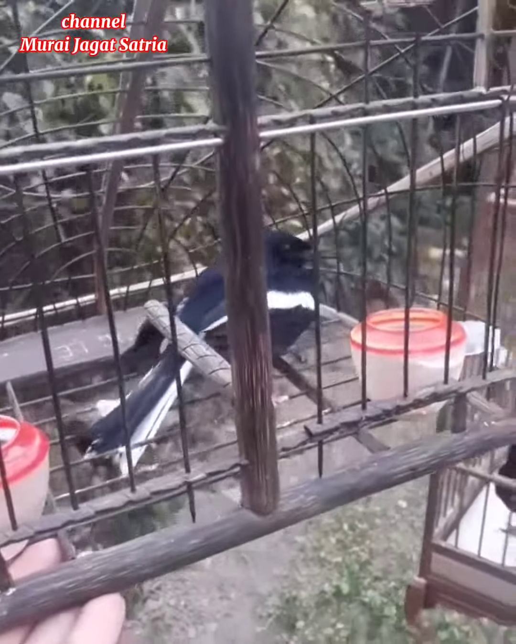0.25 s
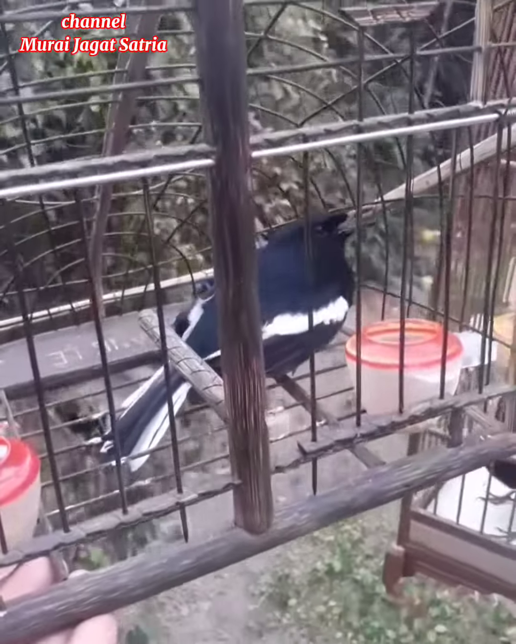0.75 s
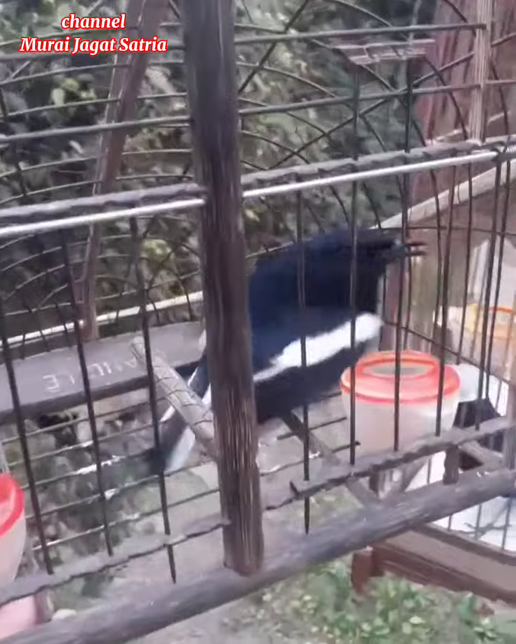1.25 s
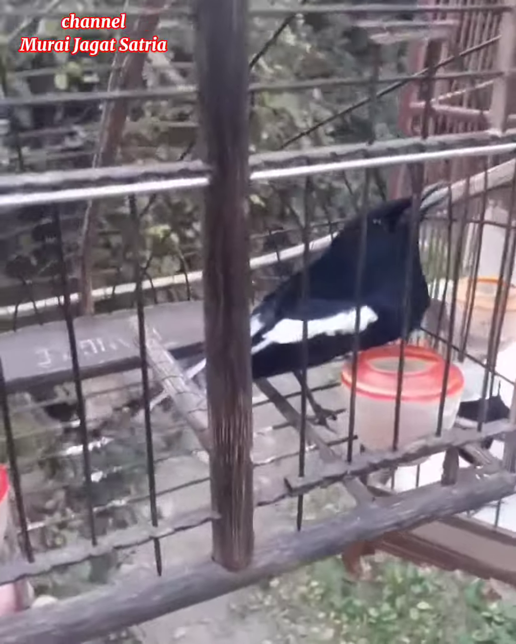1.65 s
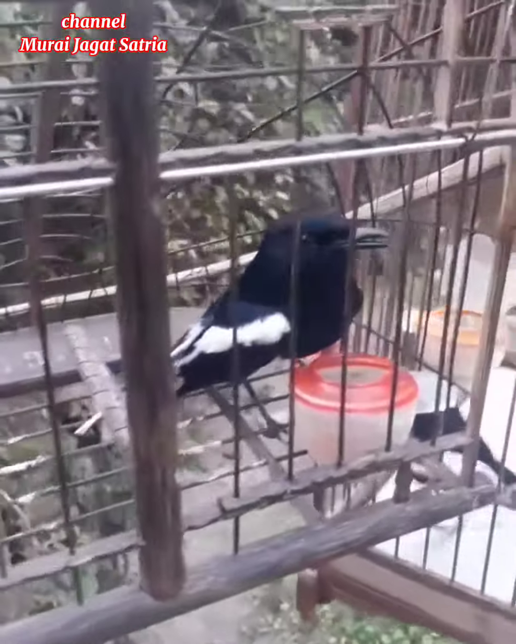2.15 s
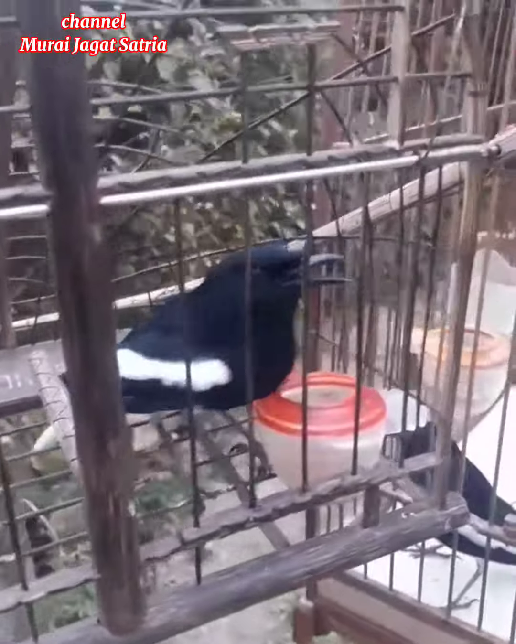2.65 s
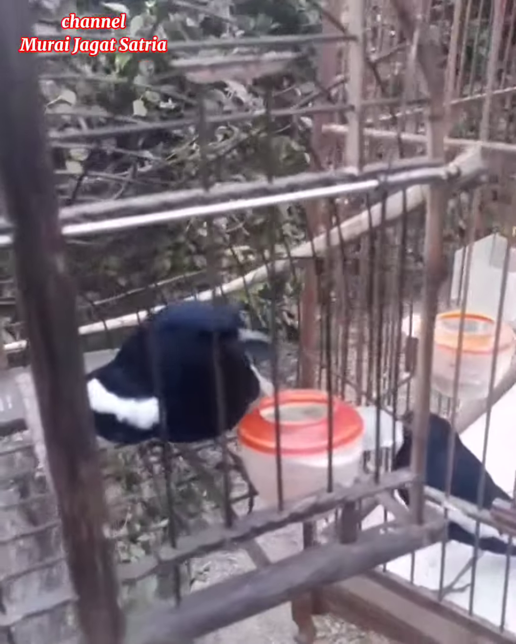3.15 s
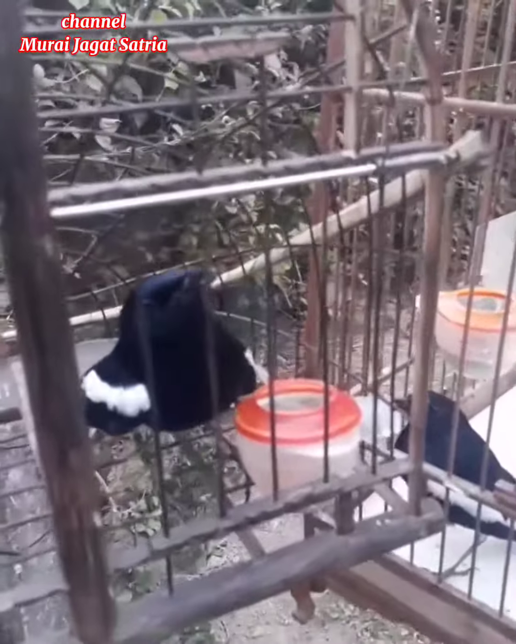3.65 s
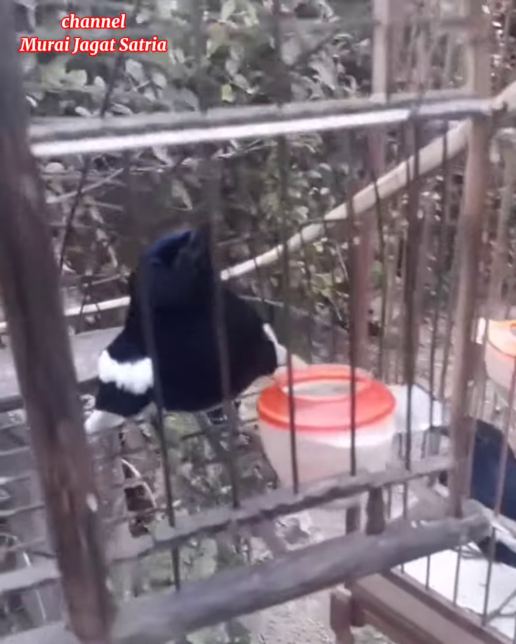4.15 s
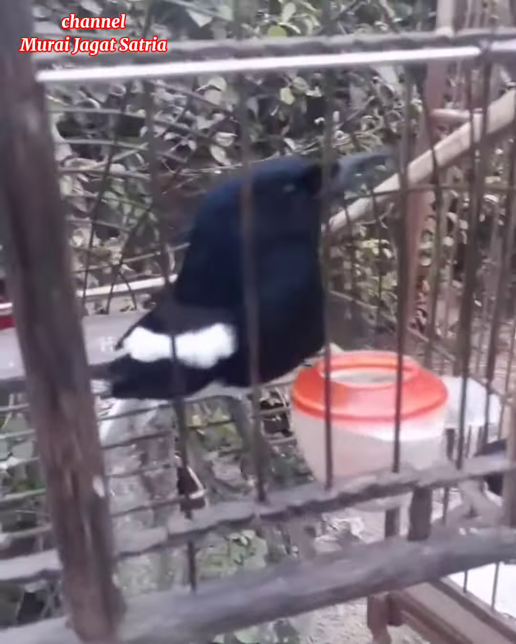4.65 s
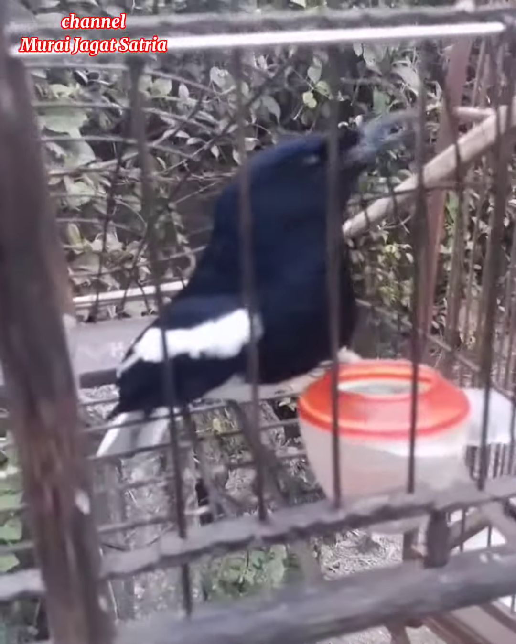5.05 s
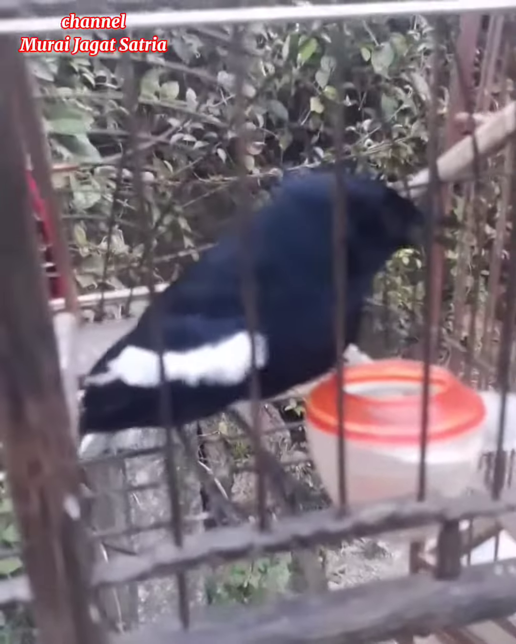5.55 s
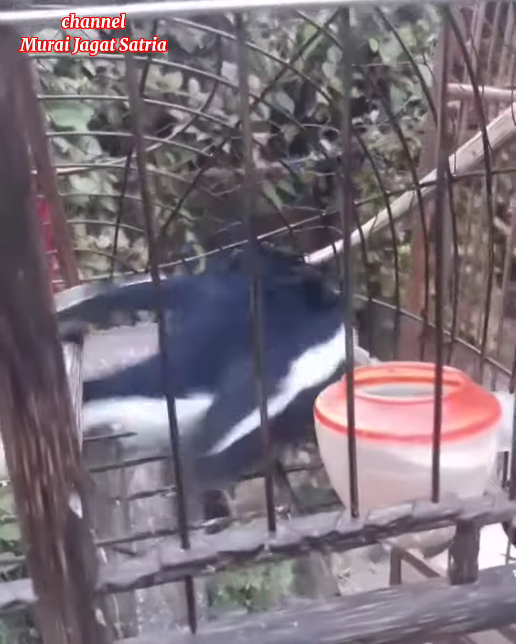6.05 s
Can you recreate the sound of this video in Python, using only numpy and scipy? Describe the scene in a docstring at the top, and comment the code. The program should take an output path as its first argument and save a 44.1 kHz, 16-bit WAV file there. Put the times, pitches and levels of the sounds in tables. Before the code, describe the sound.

A close, loud caged songbird sings in a quiet garden with a short diffuse echo. At 0 s a harsh note dies away; a thin whistle dips and rises sharply by 0.35 s. From 0.5 to 1.45 s come rapid high chirps, including a strong clear note near 1.1 and a steep downward sweep at 1.3. Short lower notes and snaps follow from 1.6, a buzzy note near 2.2, a rough rattle at 2.4 and a rising whistle to 2.75. After a pause, another rattle at 3.1 leads into mellow, buzzing notes until 4. Descending whistles run 4.03-4.43, with cage ticks near 4.33; bright upward chirps at 4.6, long piercing whistles 4.95-5.6, then quick falling and rising chirps 5.8-6.2. Low engine drone fades after 2 s; distant motor throb and faint far birds remain.

```python
"""A harsh note dies away, then a caged magpie-robin sings close by in a garden: whistles, buzzes and rattles.
The syrinx is two tone sources with overtones, flutter and hiss; sounding together, they modulate each other
into sum and difference tones. Decaying noise makes the ticks of feet and beak on the cage; sparse and diffuse
echoes answer from cage and yard. Narrow noise makes birds far off, a row of engine orders makes a distant
motor over a noise wash, and low wavering lines make a second engine that passes and fades."""
import sys
import numpy as np
from scipy import signal
from scipy.fft import rfft, irfft, next_fast_len
from scipy.io import wavfile
from scipy.ndimage import uniform_filter1d, minimum_filter1d

SR = 44100
rng = np.random.default_rng(int(sys.argv[2]) if len(sys.argv) > 2 else 0)


def transcribe(signal):
    """Save signal, clipped to [-1, 1], as a 16-bit WAV file at the path in sys.argv[1]."""
    frames = np.atleast_2d(signal).T
    limited = np.clip(frames, -1, 1)
    pcm = np.round(limited * 32767).astype(np.int16)
    wavfile.write(sys.argv[1], SR, pcm)


N = 277389
TIME = np.arange(N) / SR  # seconds


def amp(db):
    """Decibels to amplitude ratio: 20 dB is a factor of ten."""
    return 10 ** (np.asarray(db) / 20)


def unit(x):
    """Normalises the mean power, so that the rms is 1."""
    return x / np.sqrt(np.mean(x ** 2) + 1e-20)


def along(points, hz):
    """Interpolates (Hz, value) points on a logarithmic frequency axis."""
    f, v = np.transpose(points)
    return np.interp(np.log(hz + 1), np.log(f + 1), v)


def curves(rows):
    """Interpolates linearly in time: one value per sample for each column after the time."""
    s, *cols = np.transpose(rows)
    return [np.interp(TIME, s, c) for c in cols]


def filtered(x, response):
    """Linear filtering: the spectrum of x times a response of frequency."""
    m = next_fast_len(N + SR // 2)
    return irfft(rfft(x, m) * response(np.fft.rfftfreq(m, 1 / SR)), m)[:N]


def coloured(x, points):
    """Spectral shaping: x through a (Hz, dB) response."""
    return filtered(x, lambda hz: amp(along(points, hz)))


def band(centre_hz, width_hz):
    """Band-limited noise of rms 1 under a Gaussian response."""
    return unit(filtered(rng.standard_normal(N), lambda hz: np.exp(-((hz - centre_hz) / width_hz) ** 2)))


def flutter(width_hz):
    """Low-frequency random modulation of rms 1, mostly slower than width_hz."""
    knots = rng.standard_normal(int(3 * width_hz * N / SR) + 2)
    return unit(np.interp(TIME * 3 * width_hz, np.arange(len(knots)), knots))


def gate(t, start, end, edge):
    """Amplitude window: 1 between start and end, with sine-squared edges."""
    return np.sin(np.pi / 2 * np.clip(np.minimum(t - start, end - t) / edge + .5, 0, 1)) ** 2


def around(start, end):
    """The samples of a time interval, with a small margin."""
    return slice(max(int(start * SR) - SR // 200, 0), int(end * SR) + SR // 200)


def stretches(rows, edge):
    """Gated gain: holds each row's dB from its start to its end."""
    out = np.zeros(N)
    for start, end, db in rows:
        span = around(start, end)
        out[span] += amp(db) * gate(TIME[span], start, end, edge)
    return out


def dying(start, t60):
    """Free decay: a sudden start, then an exponential fall of 60 dB in t60 seconds."""
    out, span = np.zeros(N), around(start, start + 2 * t60)
    out[span] = (TIME[span] >= start) * amp(-60 * np.abs(TIME[span] - start) / t60)
    return out


def traffic():
    """Periodic excitation: a motor's thuds filtered by its exhaust, over the wash of road and leaves."""
    # Each row: time in seconds, level of the motor's throb in dB, level of the wash in dB, both before a trim.
    traffic_levels = [(0.0, -55.5, -61.5), (0.46, -47, -59.5), (0.93, -59.5, -53), (1.3, -52.5, -61.5),
                      (1.54, -54.5, -60.5), (3.41, -51.5, -62.5), (4.2, -55.5, -62.5), (4.55, -60, -62.5),
                      (4.87, -57, -64.5), (5.5, -59, -61.5), (5.66, -58, -57.5), (6.29, -59, -64)]
    # Speed of the distant motor. Each row: time in seconds, firings per second.
    motor_speed = [(0, 17.6), (.6, 18.1), (1.5, 18.4), (2.7, 18.7), (4, 18.6), (6.29, 18.5)]
    # Response of its exhaust. Each row: frequency in Hz, gain in dB.
    exhaust = [(15, -40), (25, -16.5), (45, -22.5), (70, -6.5), (100, -2), (130, 4), (150, 4), (175, -0.5),
               (215, -10), (270, -9), (410, -11.5), (520, -21), (1100, -120)]
    # Spectrum of the wash. Each row: frequency in Hz, gain in dB.
    garden = [(120, -20), (200, 1), (579, -5), (1500, -11), (2050, -12.5), (2650, -10.5), (3370, -13),
              (7680, -18.5), (8580, -26.5), (9750, -23.5), (12800, -25), (14900, -34), (16000, -54.5)]
    motor_db, road_db = curves(traffic_levels)
    turns = np.cumsum(curves(motor_speed)[0]) / SR
    # every firing is one soft thud: a row of engine orders, the higher arriving later
    cycle = np.arange(1024) / 1024
    thud = sum(np.cos(2 * np.pi * k * cycle - .25 * k * k) for k in range(3, 26))
    thuds = np.interp(turns % 1, cycle, thud)
    throb = unit(coloured(thuds, exhaust))
    rumble = amp(2) * unit(coloured(rng.standard_normal(N), exhaust))
    wash = unit(coloured(rng.standard_normal(N), garden)) * amp(flutter(width_hz=4))
    return amp(motor_db - 2.4) * (throb + rumble) + amp(road_db + 7.5) * wash


def passing_engine():
    """Common frequency modulation: low lines waver together as the engine's speed wanders."""
    # Each row: time in seconds, gain of all lines in dB.
    passing = [(0, -0.5), (.5, -1.5), (1.4, 0), (2, -2.5), (2.7, -16.5), (4, -18.5), (6.29, -21.5)]
    # The lines. Each row: mean frequency in Hz, rms level in dB before that gain.
    drone = [(75.4, -55), (165, -53.5), (183, -65), (273, -59.5), (414.5, -60.5), (600, -70.5), (680, -67)]
    clock = np.cumsum(1 + 0.0073 * flutter(width_hz=2.2)) / SR
    lines = sum(amp(db) * np.sin(2 * np.pi * (hz * clock + rng.random())) for hz, db in drone)
    return np.sqrt(2) * amp(curves(passing)[0]) * lines


def far_birds():
    """Temporal smearing: distant calls, blurred by echo, arrive as soft swells of narrow noise."""
    # Each row: start in seconds, end in seconds, centre in Hz, half-width in Hz, level in dB.
    far_calls = [(4.266, 4.421, 1343, 249.6, -53.5), (4.359, 4.801, 1037, 179.9, -59),
                 (4.869, 5.037, 2873, 649.4, -57), (5.519, 5.873, 1001, 297, -53),
                 (5.68, 5.86, 2400, 1100, -48)]
    return sum(amp(db) * gate(TIME, start, end, edge=0.088) * band(centre_hz, width_hz)
               for start, end, centre_hz, width_hz, db in far_calls)


def yard(x, near_db, tail_db):
    """Reverberation: sparse weak copies from cage and ground, and a diffuse tail from walls and hedge."""
    # Decay of the tail. Each row: frequency in Hz, 60 dB decay time in seconds.
    yard_decay = [(500, 0.22), (3000, 0.28), (5000, 0.31), (8000, 0.1), (15000, 0.031)]
    hz, t, z = signal.stft(rng.standard_normal(SR), SR, nperseg=256)
    tail = signal.istft(z * amp(-60 * t / along(yard_decay, hz)[:, None]), SR, nperseg=256)[1]
    age = np.arange(len(tail)) / SR
    sparse = (rng.random(len(tail)) < .02) * (age > .001)
    near = rng.standard_normal(len(tail)) * sparse * amp(-60 * age / 0.051)
    # each part is scaled to unit energy before its level
    answer = amp(near_db) * near / np.linalg.norm(near) + amp(tail_db) * tail / np.linalg.norm(tail)
    return signal.fftconvolve(x, answer)[:N]


def cage(ring_at=4.793):
    """Impact and resonance: beak and feet make small dry ticks; one sets a wire ringing."""
    # Each row: time in seconds, level in dB of the two decays whose difference shapes the tick.
    ticks = [(0.101, -15.5), (0.4216, -21), (1.265, -30.5), (1.276, -24), (1.5617, -28.5), (2.031, -23.5),
             (3.185, -22.5), (3.457, -16.5), (4.211, -29), (4.3245, -9), (4.341, -11), (4.793, -32),
             (5.247, -23.5)]
    # Spectrum of the ticks. Each row: frequency in Hz, gain in dB.
    tick_colour = [(1000, -23.5), (3000, 0), (7500, 0.5), (10000, -3.5), (15000, -10.5)]
    # Modes of the cage wire. Each row: frequency in Hz, level in dB, 60 dB decay time in seconds.
    wire = [(1700, -42, 0.091), (5700, -44.5, .07), (8000, -48.5, .07)]
    blows = sum(amp(db) * (dying(s, t60=0.018) - dying(s, t60=0.013)) for s, db in ticks)
    ring = sum(amp(db) * dying(ring_at, t60) * np.sin(2 * np.pi * hz * TIME) for hz, db, t60 in wire)
    return blows * unit(coloured(rng.standard_normal(N), tick_colour)) + ring


def spits():
    """Transient turbulence: bright noise bursts as the syrinx snaps open, and one duller harsh note."""
    # Sharp starts of notes. Each row: start in seconds, end in seconds, level in dB.
    spit_times = [(2.3035, 2.308, -22.5), (2.308, 2.319, -30.5), (2.42, 2.427, -14.5), (2.427, 2.435, -23),
                  (5.941, 5.947, -29), (5.947, 5.957, -32.5)]
    # Spectrum of the bursts. Each row: frequency in Hz, gain in dB.
    spit_colour = [(1000, -24), (4000, -15), (6000, -9), (7300, 2.5), (9000, -1), (12000, -10), (14500, -1),
                   (16000, -13)]
    # Spectrum of the harsh note that opens the song. Each row: frequency in Hz, gain in dB.
    harsh_colour = [(600, -41), (1200, -9.5), (3000, 3), (4500, 7), (6200, 0), (7500, -20), (10000, -26),
                    (15000, -42)]
    bright = stretches(spit_times, edge=0.0018) * unit(coloured(rng.standard_normal(N), spit_colour))
    harsh = amp(-19.5) * dying(0, t60=0.12) * unit(coloured(rng.standard_normal(N), harsh_colour))
    return bright + harsh


def chirp(t, length, first_hz, middle_hz, last_hz, fall, db, crest, swell_db):
    """Frequency glide under one swell of breath: pitch, level, and octaves sunk below the crest."""
    scoop_octaves, scoop_s = .03, .005  # a slide up into the arch, and its time constant
    fall_s, fade_db = .007, 17.5  # time constant of the closing fall; fade after the crest
    swell_curve, fade_curve = 1.8, 1.9  # 1 = a pointed crest, 2 = a rounded one
    u, crest = np.clip(t / length, 0, 1), np.clip(crest, .05, .95)
    arch = np.polyfit([0, .5, 1], [first_hz, middle_hz, last_hz], 2)

    def pitch(u):
        scoop = scoop_octaves * np.exp(-u * length / scoop_s)
        closing = fall * np.exp((u - 1) * length / fall_s)
        return np.polyval(arch, u) * 2 ** (-scoop - closing)

    swell = swell_db * np.abs(1 - u / crest) ** swell_curve
    fade = fade_db * np.abs((u - crest) / (1 - crest)) ** fade_curve
    loss = np.where(u < crest, swell, fade)
    return pitch(u), db - loss, np.maximum(0, np.log2(pitch(crest) / pitch(u)))


def add(side, start, end, hz, db, *timbre):
    """Single-oscillator rule: where notes of one side meet, the louder one holds the membrane."""
    span = around(start, end)
    gain = amp(db) * gate(TIME[span], start, end, edge=.0023)
    now = np.array(np.broadcast_arrays(hz, gain, *timbre))
    side[:, span] = np.where(now[1] > side[1, span], now, side[:, span])


def add_rattles(side):
    """Joint frequency and amplitude modulation: pitch and level pump together in beats."""
    # Each row: start in seconds, length in seconds, time of the first crest in seconds, beats per second,
    # first mean pitch in Hz, last mean pitch in Hz, swing at mid-length in Hz, crest level in dB,
    # crest overtone in dB re the tone, mean harshness in dB.
    rattles = [(2.407, .124, 2.42, 28.3, 1667, 1612, 233.6, -18, 1, -10),
               (3.08, .147, 3.091, 31.8, 1338, 1568, 173.3, -20, -12, -16)]
    dip_db, press_db = 10, 9  # between beats the tone dips and the overtone gains on it
    lean, scatter_db = .2, 2.5  # each beat falls faster than it rises; the level strays at random
    narrowing, growth_db = .4, -0.5  # over its length the swing narrows and the level drops a little
    rise_s, rise_db = 0.0077, 6  # a rattle swells in over this time, from this far down
    bite = 0.29  # how much of the harshness gathers on the crests of the beats
    uneven_db = scatter_db * flutter(width_hz=19)
    for start, length, crest, rate, first_hz, last_hz, swing_hz, db, overtone_db, harsh_db in rattles:
        span = around(start, start + length)
        t = TIME[span]
        turn = 2 * np.pi * rate * (t - crest)
        beat = np.cos(turn + lean * (1 - np.cos(turn)))
        u, slack = (t - start) / length, (1 - beat) / 2
        swing = swing_hz * (1 - narrowing * (u - .5)) * beat
        hz = first_hz + (last_hz - first_hz) * u + swing
        rise = rise_db * np.clip(1 - (t - start) / rise_s, 0, 1)
        level_db = db + growth_db * (u - .5) + uneven_db[span] - dip_db * slack - rise
        add(side, start, start + length, hz, level_db,
            overtone_db + press_db * slack, amp(harsh_db) * (1 + bite * beat))


def main_side():
    """Source control: pitch, amplitude, overtone dB and harshness through chirps, rattles and whistles."""
    # Short notes. Each row: start in seconds, length in seconds, first, middle and last pitch of the arch in Hz,
    # closing fall in octaves, crest level in dB, crest as a share of the length, swell up to it in dB,
    # overtone at the crest in dB re the tone, harshness in dB.
    chirps = [(0.519, 0.069, 2799, 2540.0, 3410.0, 0.023, -36.5, 0.51, 3, 15.5, -8.5),
              (0.5828, 0.042, 3258, 4100.0, 4190.0, 0.22, -19, 0.74, 9, -15.5, -18.5),
              (0.6704, 0.031, 4545, 4950.0, 4420.0, 0.0, -17.5, 0.74, 12, -31, -12.5),
              (0.78, 0.048, 3885, 3700.0, 3820.0, 0.0, -28.5, 0.98, 3.5, -3, -13),
              (0.82, 0.037, 3740.0, 4950.0, 4610.0, 0.03, -8, 0.54, 18, -24, -9),
              (0.9085, 0.044, 5110, 5670.0, 5200.0, 0.2, -10.5, 0.3, 15.5, -32, -14),
              (0.959, 0.04, 4072, 4930.0, 4100.0, 0.06, -12.5, 0.51, 15.5, -19, -17.5),
              (1.016, 0.028, 4010, 4420.0, 3900.0, 0.06, -12, 0.47, 17, -25.5, -36),
              (1.073, 0.1, 4592, 4870.0, 3800.0, 0.0014, -3.5, 0.19, 15, -47, -52.5),
              (1.303, 0.068, 5750.0, 4180.0, 2220.0, 0.12, -3.5, 0.38, 9.5, -29.5, -14.5),
              (1.408, 0.048, 3110, 3130.0, 2650.0, 0.0051, -14.5, 0.38, 18.0, -30.5, -36),
              (1.615, 0.016, 1702, 1690.0, 1910.0, 0.0012, -22.5, 0.7, 8.0, -1, -25),
              (1.629, 0.036, 2999, 3640.0, 4400.0, 0.24, -3.5, 0.8, 9.5, -39.5, -31),
              (1.752, 0.0082, 2918, 2450.0, 2020.0, 0.0, -15, 0.37, 15, -27, -19.5),
              (1.7612, 0.043, 2369, 2490.0, 2510.0, 0.12, -15.5, 0.75, 5.5, -23.5, -25.5),
              (1.941, 0.014, 2840.0, 2500.0, 2580.0, 0.0, -8, 0.17, 4.5, -28.0, -35),
              (2.1036, 0.06, 2576, 2900.0, 2560.0, 0.27, -15.5, 0.62, 22, -8.5, -8),
              (2.1614, 0.085, 1636, 1820.0, 1830.0, 0.1, -18.0, 0.8, 7, -17, -10),
              (2.306, 0.035, 2921, 2570.0, 1970.0, 0.03, -13.0, 0.85, 19.5, -18.5, -18),
              (2.339, 0.0125, 2347, 2700.0, 3380.0, 0.0, -7.5, 0.24, 17.5, -25.5, -13.5),
              (3.233, 0.042, 2019, 2090.0, 1790.0, 0.03, -14.5, 0.64, 17.5, 2.5, -21),
              (3.318, 0.056, 1536, 2577, 2021, 0, -10, 0.6, 18, -34.5, -21),
              (3.368, 0.034, 2206, 1610, 1289, 0, -19, 0.52, 6, 1.5, -15),
              (3.444, 0.063, 2690.0, 2390.0, 1430.0, 0.052, -14.4, 0.13, 7.5, -38.5, -12.0),
              (3.511, 0.014, 1326, 1550.0, 1580.0, 0.064, -22, 0.53, 4, -21.5, -25.0),
              (3.6105, 0.1275, 1743, 2060.0, 2270.0, 0.0084, -19, 0.82, 3.0, -31.5, -21.5),
              (3.7818, 0.012, 1722, 1620.0, 1850.0, 0.0, -23.1, 0.75, 12.5, -16.5, -28),
              (3.7939, 0.063, 2251, 2460.0, 2090.0, 0.0, -13.5, 0.59, 14.5, -32.5, -42.5),
              (3.9078, 0.11, 1894, 2740.0, 2700.0, 0.03, -11.5, 0.69, 18, -33.5, -32.5),
              (4.562, 0.026, 3733, 4700.0, 5450.0, 0.13, -11.5, 0.66, 17.5, -38.5, -17.5),
              (4.5879, 0.034, 3963, 4800.0, 5500.0, 0.0042, -8.5, 0.42, 21, -49, -15.5),
              (4.706, 0.037, 3168, 2960.0, 2280.0, 0.048, -24.5, 0.34, -1, -43, -41),
              (5.809, 0.07, 4310, 3050.0, 3040.0, 0.0, -21, 0.17, 3.5, -14.5, -7),
              (5.854, 0.034, 5360, 3380.0, 2660.0, 0.017, -18, 0.23, 7.5, -21.5, -10),
              (5.886, 0.034, 4882, 3010.0, 2490.0, 0.0035, -21, 0.18, -1, -19.5, -10.5),
              (6.015, 0.04, 3396, 4770.0, 5550.0, 0.38, -9, 0.73, 27.5, -23, -11),
              (6.056, 0.042, 4220, 5100.0, 6440.0, 0.037, -10.5, 0.34, 11.5, -10.5, -9),
              (6.165, 0.044, 3185, 2900.0, 2180.0, 0.0, -17.5, 0.39, 11, -35, -35)]
    # Long drawn whistles, one list each. Each row: time in seconds, pitch in Hz, level in dB,
    # overtone in dB re the tone.
    whistles = [
        [(.15, 3580, -19.5, -34), (.185, 3515, -19, -33), (.215, 3123, -20.5, -41), (.275, 2700, -25, -25),
         (.305, 3073, -26.5, -33), (.335, 3557, -15.5, -28.5), (.358, 3804, -5, -38), (.368, 3531, -9.5, -44),
         (.378, 2099, -29, 9)],
        [(1.821, 3640, -33, -44), (1.845, 3580, -21, -40.5), (1.858, 3206, -20, -40), (1.868, 3386, -22.5, -39),
         (1.88, 2820, -17, -31), (1.905, 2790, -12, -31.5), (1.93, 2562, -11.5, -22.5), (1.936, 2567, -27, -21)],
        [(2.601, 1933, -27.5, -5), (2.612, 2316, -20, 2), (2.63, 2502, -15.5, 4.5), (2.66, 2670, -12.5, 6.5),
         (2.7, 3020, -15.5, -29), (2.724, 3097, -9, -17.5), (2.73, 4090, -3, -47), (2.738, 1878, -22.5, 15),
         (2.743, 2429, -16, -3.5), (2.749, 1273, -27.5, 9)],
        [(4.033, 4022, -33, -33.5), (4.05, 3770, -12, -57.5), (4.08, 3570, -10.5, -25.5),
         (4.115, 3461, -8, -47), (4.145, 3383, -8.5, -29.5), (4.164, 2746, -8.5, -24.5),
         (4.17, 2007, -20, -0.5), (4.178, 1528, -32.5, 9)],
        [(4.234, 2950, -19, -24.5), (4.265, 2858, -9.5, -38.5), (4.274, 2946, -16.5, -24),
         (4.285, 2789, -9, -30), (4.296, 2780, -12, -24), (4.302, 2859, -31, -11)],
        [(4.307, 2838, -8.5, -25), (4.321, 2655, -12, -25), (4.326, 3007, -21, -10), (4.334, 2639, -8, -29),
         (4.346, 2648, -20, -12), (4.353, 2657, -11.5, -32.5), (4.4, 2372, -10.5, -4.5), (4.418, 2048, -17, 5),
         (4.425, 2800, -13.5, -16), (4.43, 1984, -36.5, 21)],
        [(5.028, 4361, -31, -31), (5.045, 4232, -20.5, -21), (5.095, 3980, -18.5, -30), (5.138, 3979, -7, -63),
         (5.148, 3833, -19.5, -34), (5.162, 3785, -12, -38.5), (5.218, 3804, -25.5, -34)],
        [(5.299, 3182, -36, -26), (5.304, 3237, -19.5, -46), (5.345, 3384, -17.5, -40.5),
         (5.385, 3385, -10.5, -29.5), (5.408, 3330, -11, -29), (5.42, 3167, -13.5, -40),
         (5.445, 3080, -15.5, -36), (5.458, 3620, -20.5, -39.5), (5.475, 4187, -6.5, -42),
         (5.492, 4177, -10.5, -58.5), (5.512, 4235, -4, -35), (5.545, 4350, -8, -14.5), (5.572, 4710, -11, -11),
         (5.6, 4610, -14, -22), (5.615, 3874, -20, -19), (5.627, 2780, -25.5, -3.5), (5.642, 2418, -30.5, -2.5)],
    ]
    # the throat stays tuned to the crest: as the pitch sinks, the overtone slides into it
    overtone_db_per_octave = 33
    side = np.zeros((4, N))
    for start, length, *shape, overtone_db, harsh_db in chirps:
        hz, db, sunk = chirp(TIME[around(start, start + length)] - start, length, *shape)
        add(side, start, start + length, hz, db,
            overtone_db + overtone_db_per_octave * sunk, amp(harsh_db))
    add_rattles(side)
    for whistle in whistles:
        s, *cols = np.transpose(whistle)
        t = TIME[around(s[0], s[-1])]
        add(side, s[0], s[-1], *[np.interp(t, s, c) for c in cols], 0)
    return side


def second_side():
    """Independent second source: pitch and amplitude of the plain arches that the other side sings."""
    # Each row: start in seconds, length in seconds, first, middle and last pitch of the arch in Hz,
    # crest level in dB, crest as a share of the length, swell up to it in dB.
    second_chirps = [(0.121, 0.014, 3940.0, 3820, 3810, -22.0, 0.6, 1.0),
                     (0.125, 0.039, 4790.0, 4676, 4395, -17.0, 0.55, 14),
                     (0.203, 0.058, 2650.0, 2280, 2269, -30, 0.17, 4.5),
                     (0.4883, 0.037, 4400.0, 4180, 3855, -19, 0.27, 1),
                     (0.519, 0.068, 5360.0, 5100, 5540.0, -16.5, 0.49, 0),
                     (0.602, 0.022, 5610.0, 5790.0, 5725, -18.6, 0.27, 2.0),
                     (0.67, 0.0086, 6160.0, 6690, 7217, -17.5, 0.37, 5),
                     (0.6877, 0.036, 6830.0, 5730, 5027, -3.5, 0.4, 16),
                     (0.802, 0.036, 2320.0, 2700.0, 3809, -25, 0.7, 16),
                     (0.915, 0.029, 4050.0, 4024, 3821, -26, 0.44, 6),
                     (2.109, 0.069, 3820.0, 4100, 3817, -15.6, 0.59, 12),
                     (2.303, 0.013, 5980.0, 7490.0, 7438, -16, 0.08, 10),
                     (2.42, 0.0091, 2750.0, 2273, 2250, -16, 0.36, 2.0),
                     (2.421, 0.008, 7300.0, 6550, 7670, -15, 0.46, 5.5),
                     (2.456, 0.011, 2770.0, 2138, 1842, -13.5, 0.087, -6),
                     (2.491, 0.0097, 3470.0, 1897, 1562, -12.1, 0.09, 0.0),
                     (2.619, 0.1, 3950.0, 4366, 4388, -18, 0.79, 2),
                     (3.258, 0.011, 3520.0, 2656, 2834, -16, 0.13, 5.5),
                     (3.443, 0.0605, 1280.0, 1128, 956.5, -26, 0.99, 4.5),
                     (4.605, 0.033, 3020.0, 4650.0, 5360, -6.5, 0.54, 23),
                     (4.9246, 0.203, 5300.0, 5034, 4740, -10.5, 0.54, 30.5),
                     (5.158, 0.056, 3600.0, 2980, 2834, -12, 0.94, 4.0),
                     (5.413, 0.048, 3100.0, 2250.0, 2917, -28, 0.7, 0),
                     (5.567, 0.014, 4680.0, 4950, 4450, -8, 0.5, 6),
                     (5.585, 0.016, 5650.0, 5300.0, 4785, -13.5, 0.5, 9),
                     (5.6, 0.024, 5680.0, 4965, 3882, -12.5, 0.42, 4),
                     (5.787, 0.027, 6260.0, 6290.0, 6305, -33, 0.4, 0.5),
                     (5.818, 0.029, 5140.0, 3900.0, 2913, -18, 0.19, 2.5),
                     (5.942, 0.0057, 7130.0, 7770, 6440, -18, 0.091, 13),
                     (6.0665, 0.042, 3220.0, 4820, 5350, -7, 0.62, 20)]
    side = np.zeros((2, N))
    for start, length, first_hz, middle_hz, last_hz, *breath in second_chirps:
        t = TIME[around(start, start + length)] - start
        hz, db, _ = chirp(t, length, first_hz, middle_hz, last_hz, 0, *breath)
        add(side, start, start + length, hz, db)
    return side


def vibrato_of_main_side():
    """Frequency modulation: fast sinusoidal vibrato, in Hz, heard as buzzing."""
    # Each row: start in seconds, end in seconds, rate in Hz, depth in Hz.
    buzzes = [(.205, .252, 110, 90), (1.642, 1.666, 190, 220), (2.165, 2.248, 150, 300),
              (3.318, 3.342, 170, 300), (3.608, 3.71, 158, 120), (3.906, 4.005, 152, 115),
              (4.033, 4.11, 160, 95), (4.11, 4.165, 160, 35), (5.465, 5.487, 200, 100),
              (5.568, 5.63, 70, 200), (6.022, 6.1, 330, 170)]
    vibrato = np.zeros(N)
    for start, end, rate_hz, depth_hz in buzzes:
        span = around(start, end)
        swing = np.sin(2 * np.pi * rate_hz * (TIME[span] - start))
        vibrato[span] += depth_hz * gate(TIME[span], start, end, edge=0.0054) * swing
    return vibrato


def membrane(hz, rasp, drift):
    """Irregular self-oscillation: phase and strength of a vibrating membrane; rasp shakes both."""
    wander = drift + .06 * rasp  # the harsher a note, the more its pitch stumbles (share of the pitch)
    phase = 2 * np.pi * np.cumsum(hz * (1 + wander * flutter(width_hz=120))) / SR
    return phase + 0.61 * rasp * flutter(width_hz=800), 1 + 0.62 * rasp * flutter(width_hz=750)


def song():
    """Source, intermodulation and filter: two coupled tone sources with overtones, through the beak."""
    # Stretches where alternate cycles differ, so that lines appear halfway between the harmonics.
    # Each row: start in seconds, end in seconds, level in dB re the tone.
    doublings = [(2.105, 2.725, -27), (3.08, 3.195, -21), (3.442, 3.51, -21), (4.235, 4.38, -22),
                 (4.38, 4.425, -14)]
    # Hoarse stretches. Each row: start in seconds, end in seconds, added harshness in dB.
    hoarse = [(.2, .25, -19.5), (4.39, 4.429, -30.5), (5.56, 5.635, -21)]
    # Spectrum of turbulent air in the throat. Each row: frequency in Hz, gain in dB.
    hiss_colour = [(1000, -30.5), (2500, -4.5), (4500, 4.5), (7500, -10.5), (10000, -2), (12500, -5),
                   (15500, -9.5)]
    # How beak and throat pass the song. Each row: frequency in Hz, gain in dB.
    beak = [(500, -10), (1200, -4.5), (2500, 1.5), (5000, -0.5), (7800, 6), (9000, -9), (11000, -6),
            (13000, -3), (15500, -4.5)]
    main_hz, main_gain, overtone_db, harshness = main_side()
    second_hz, second_gain = second_side()
    vibrato = vibrato_of_main_side()
    richness = amp(np.minimum(overtone_db, 15)) * (main_gain > 0)
    richness = np.hypot(richness, amp(-33.5) * main_gain ** 2)  # sheer loudness adds overtone
    pressed = np.minimum(richness, 1)
    # flutter of any tone, of hoarse stretches, and of harsh or pressed notes
    roughness = uniform_filter1d(np.hypot(harshness, amp(-23.5) * pressed), size=150)
    rasp = amp(-38) + stretches(hoarse, edge=.004) + roughness
    a, shake_a = membrane(main_hz + vibrato, rasp, drift=0.0056)
    b, shake_b = membrane(second_hz, rasp, drift=.004)
    main_gain = main_gain * shake_a * amp(0.0156 * vibrato)  # the level follows the vibrato, in dB per Hz
    second_gain = second_gain * shake_b

    def partial(k):
        return np.sin(k * a) * (k * main_hz < SR / 2)

    # a pressed membrane slaps shut: a strong overtone and a row of weak ones
    weak_row = sum(amp(-39.5 - 1.7 * (k - 5.5)) * partial(k) for k in range(4, 8))
    overtones = partial(2) + amp(-22) * partial(3) + weak_row
    # even a pure whistle keeps a faint sheen
    sheen = amp(-51.5) * partial(3) + amp(-53) * partial(4) + amp(-55) * partial(5)
    halfway = amp(-21.5) * np.sin(a / 2) + np.sin(a + a / 2) + amp(-24.5) * np.sin(2 * a + a / 2)
    doubled = stretches(doublings, edge=.01) * halfway
    main = main_gain * (np.sin(a) + richness * overtones + sheen + doubled)
    second = second_gain * (np.sin(b) + amp(-33.5) * np.sin(2 * b) + amp(-51) * np.sin(3 * b))
    # each side modulates the other's air flow; the sum tones grow when pressed
    strength = np.hypot(main_gain, second_gain)
    both = main_gain * second_gain / (strength + 1e-9)
    high_sums = amp(-14.5) * np.sin(2 * a + b) + amp(-26) * (np.sin(a + 2 * b) + np.sin(3 * a + b))
    sums = (amp(-23.5) + amp(-2.5) * pressed) * (np.sin(a + b) + high_sums)
    differences = amp(-26) * np.sin(a - b) + amp(-24.5) * np.sin(2 * a - b) + amp(-21) * np.sin(2 * b - a)
    # harsh and pressed notes also hiss
    main_share = main_gain / (main_gain + second_gain + 1e-9)
    turbulence = amp(-15.5) * rasp + amp(-39.5) * pressed * main_share + amp(-56.5)
    hiss = turbulence * strength * unit(coloured(rng.standard_normal(N), hiss_colour))
    return coloured(main + second + both * (sums + differences) + hiss, beak)


def scene():
    """Superposition: the bird and its echoes add to the distant birds and engines."""
    bird = song() + spits() + cage()
    echoes = yard(bird, near_db=-16, tail_db=-23)
    return bird + echoes + far_birds() + traffic() + passing_engine()


def record(dry):
    """Peak limiting and low-pass filtering: loud notes stay under full scale and the top is cut off."""
    top_hz = 15900
    needed = np.minimum(1, .93 / (np.abs(dry) + 1e-9))
    # the lowest gain needed nearby, smoothed over 5 ms
    gain = uniform_filter1d(minimum_filter1d(needed, size=221), size=221)
    return filtered(dry * gain, lambda hz: 1 / (1 + (hz / top_hz) ** 160))


dry = scene()
out = record(dry)
transcribe(out)
```